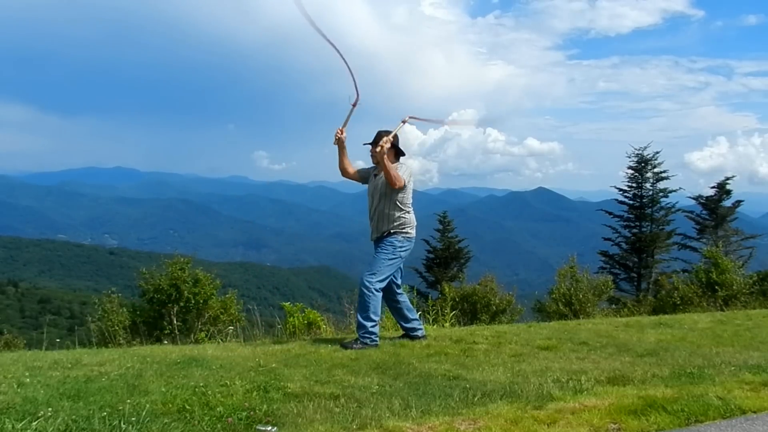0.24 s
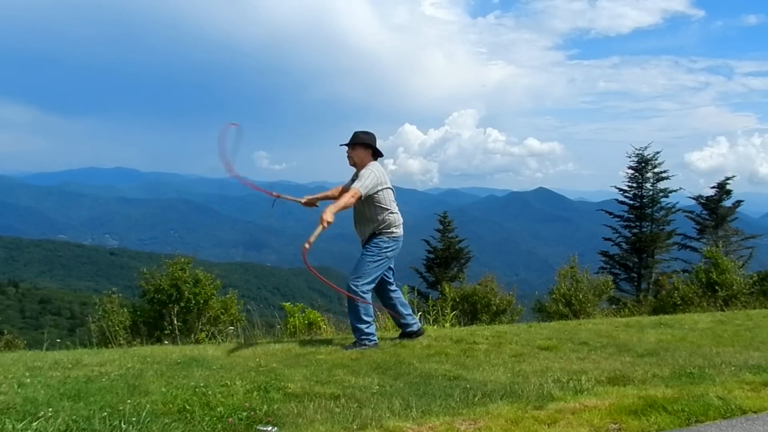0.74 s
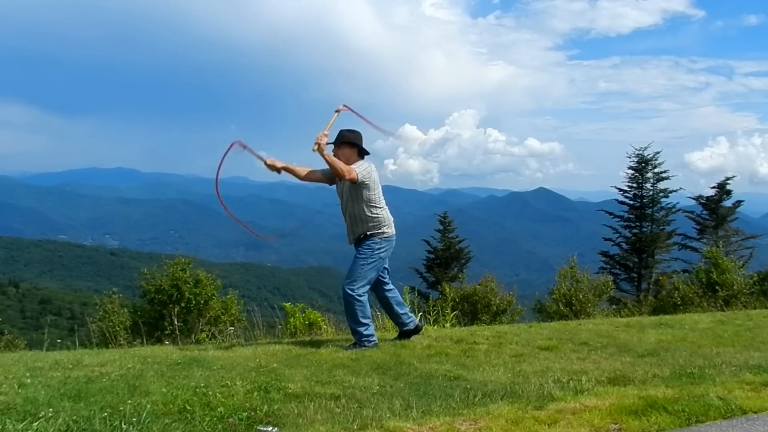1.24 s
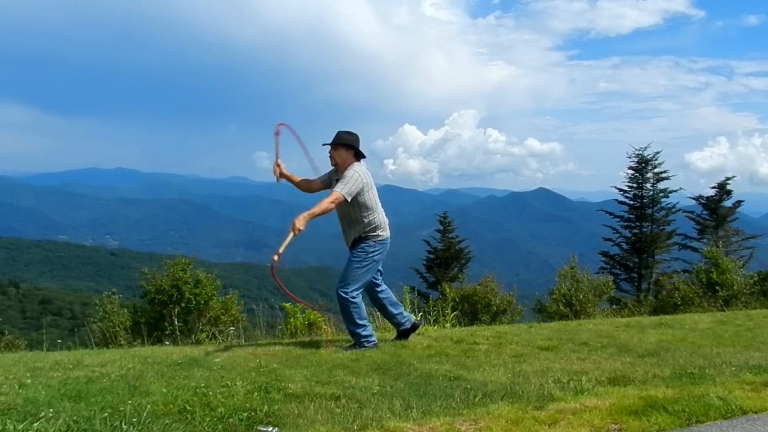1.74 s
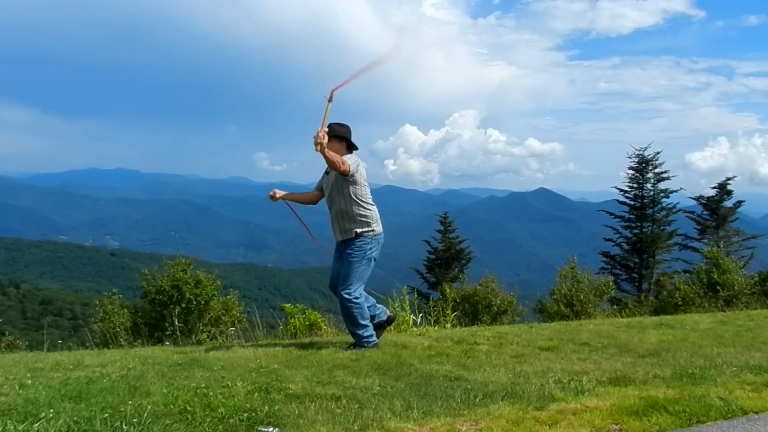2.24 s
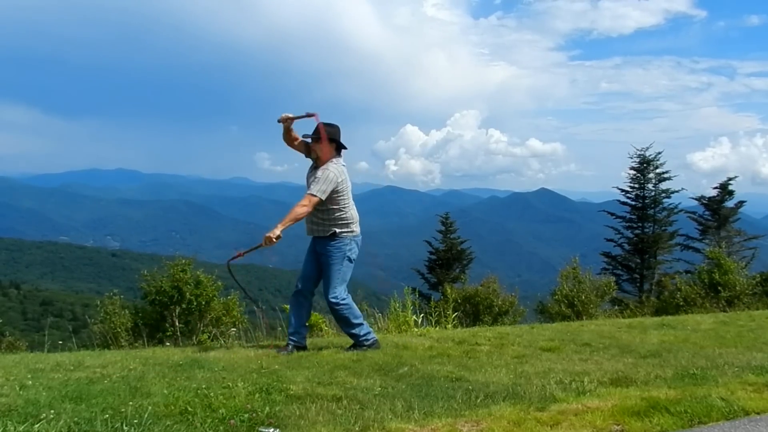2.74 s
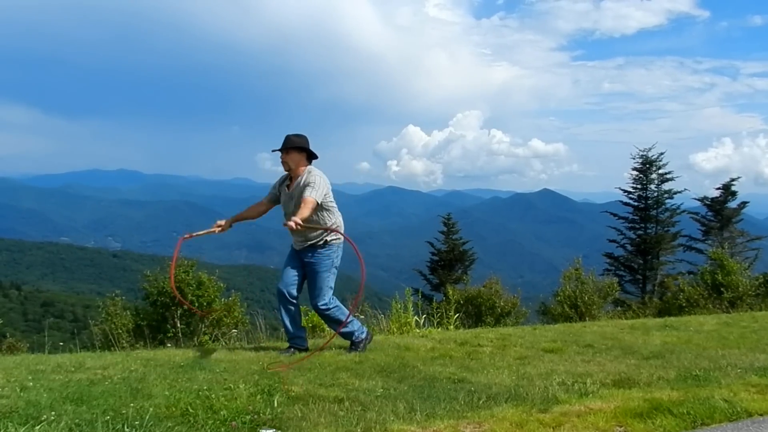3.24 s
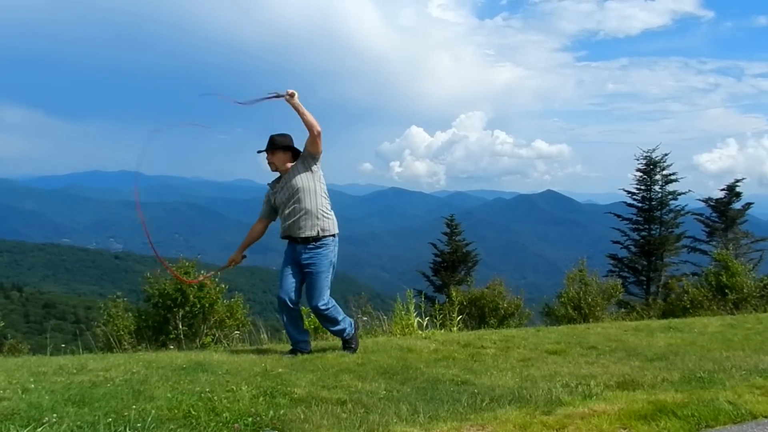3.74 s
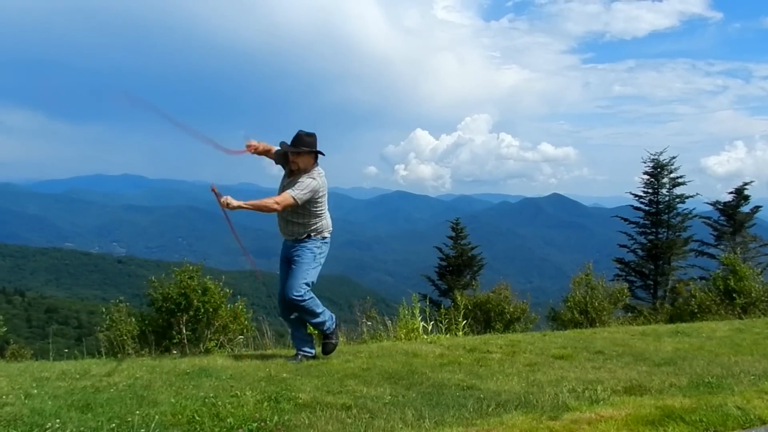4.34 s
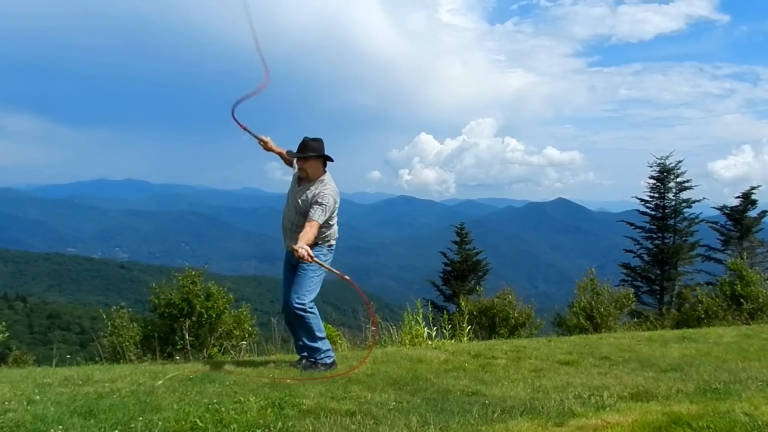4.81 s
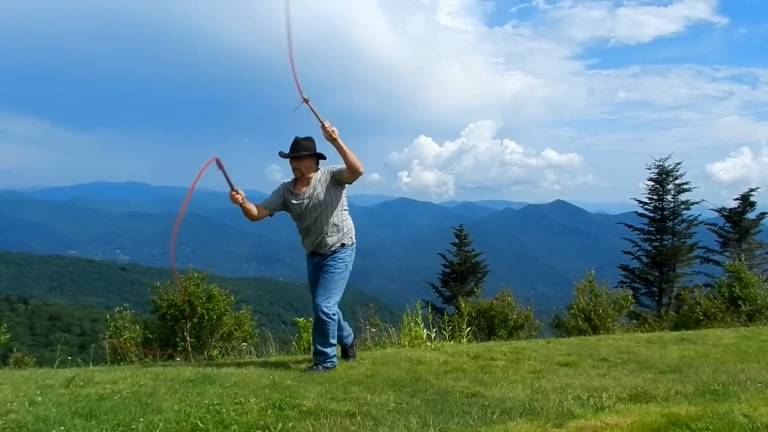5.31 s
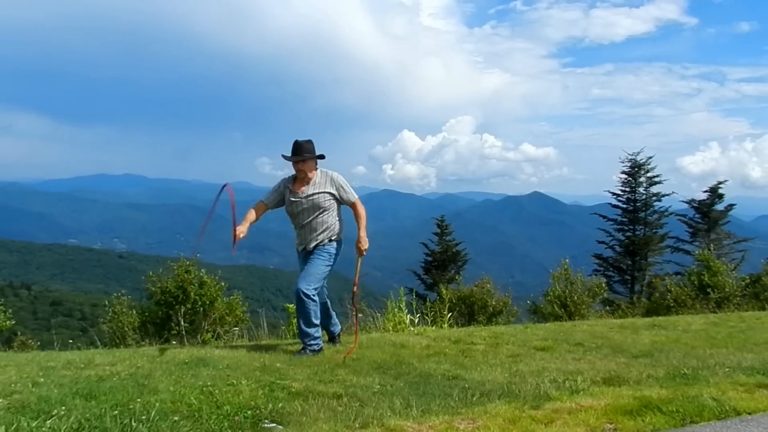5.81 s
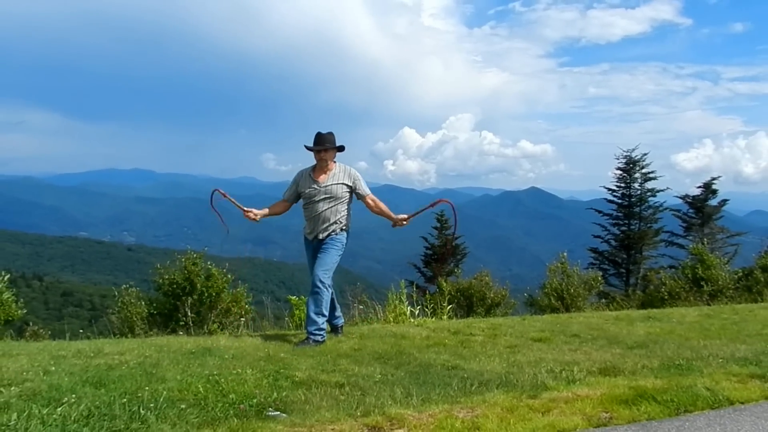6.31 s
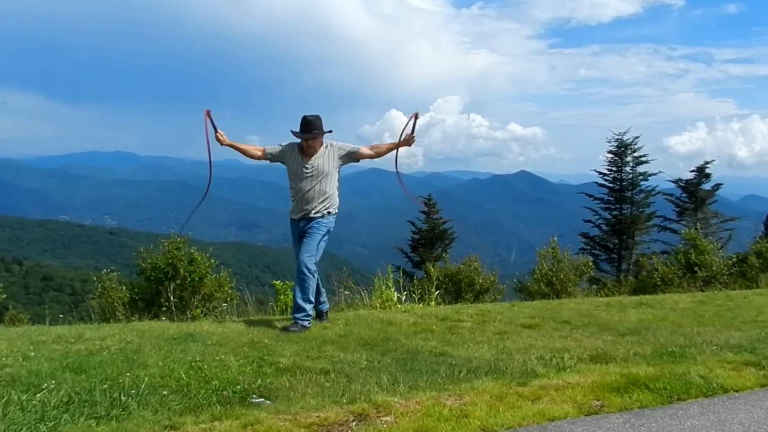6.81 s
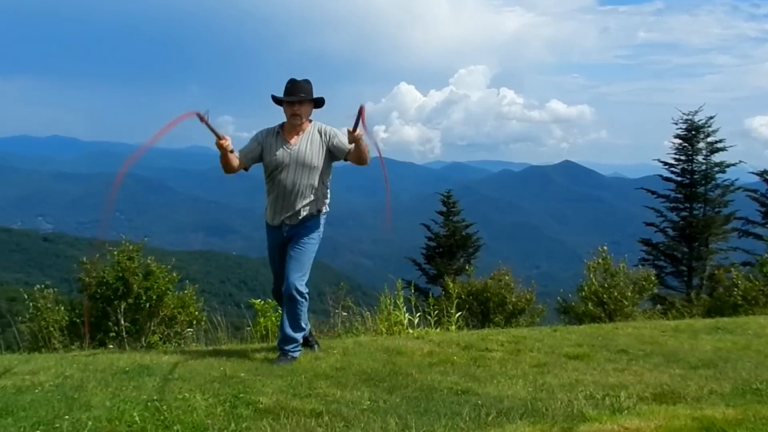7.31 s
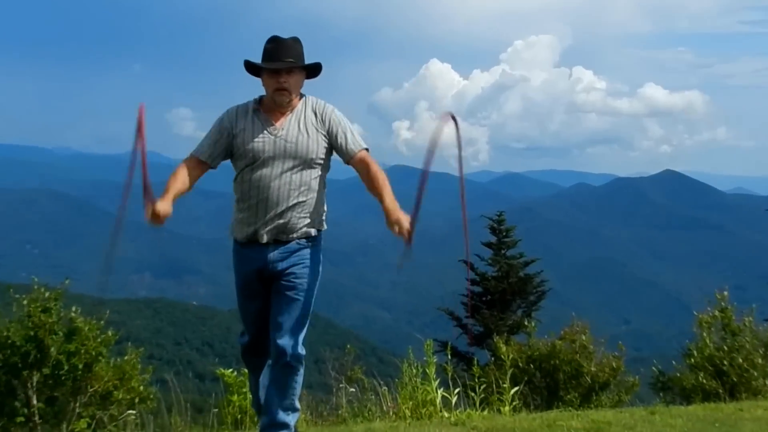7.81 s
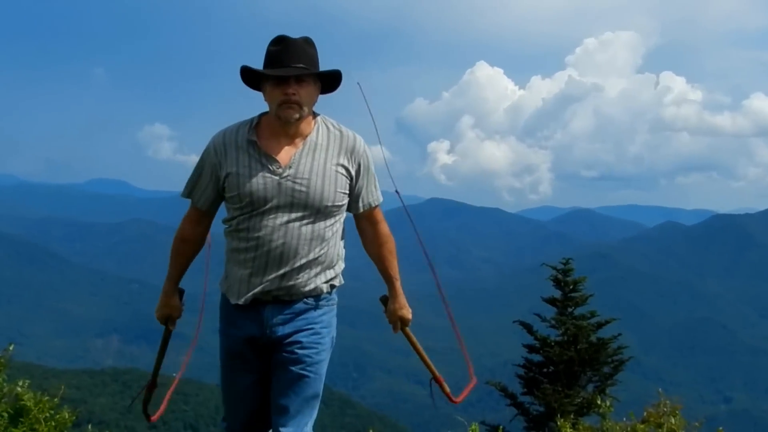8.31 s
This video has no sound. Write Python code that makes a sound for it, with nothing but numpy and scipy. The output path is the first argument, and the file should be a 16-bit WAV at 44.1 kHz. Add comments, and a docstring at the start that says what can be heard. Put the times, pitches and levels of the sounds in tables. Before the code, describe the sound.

Open grassy ridge, two whips a few metres from a stereo camera microphone. Low lumpy wind and a soft far rustle run throughout, with puffs thudding on the microphone at 0.5-0.9 s, 2.7, 4.2 and 7.1 s. Whooshes and a thin whistle lead to a weak double crack at 0.6 s, then bright hard cracks at 0.9, 1.55, 2.0 and 2.6 s, each with quick faint echoes. A duller crack comes at 3.4, a muffled, hissy one at 4.2, a weak stuttering cluster at 4.5 and another at 5.0, among swishes and light slaps. Slaps crowd 5.2-5.6 before a sharp crack at 5.7 and a huge one at 6.0. Whooshes and blunt slaps follow at 6.4-6.6, a double crack at 7.1, a duller pair at 7.45, and a violent, thumping cluster at 8.0. The background ducks after the loudest, then creeps back; a faint motor whirr, swishes and rising wind close.

```python
"""An open grassy ridge: two stock whips crack some metres from a camera, over wind and a steady far rustle.
Each crack is a shock front with noise scattered by the ground; a far bank and nearby objects echo it.
Between cracks are whooshes, whistles and swishes (band noise) and slaps (blunter shocks). Wind is lumpy low
noise with puffs on the microphone ports; a zoom motor whirrs late on. Gain control ducks after loud cracks and
creeps back. Table levels are those ahead of that gain control and band limit."""
import sys
import numpy as np
from scipy import signal
from scipy.fft import rfft, irfft, next_fast_len
from scipy.io import wavfile
from scipy.ndimage import uniform_filter1d, minimum_filter1d, map_coordinates

SR = 44100
rng = np.random.default_rng(int(sys.argv[2]) if len(sys.argv) > 2 else 0)


def generate_wav(signal):
    """Clip the signal to [-1, 1] and save it as 16-bit WAV at the path in sys.argv[1]."""
    frames = np.transpose(np.atleast_2d(signal))
    scaled = np.clip(frames, -1, 1) * 32767
    pcm = np.round(scaled).astype(np.int16)
    wavfile.write(sys.argv[1], SR, pcm)


N = 377048


def amp(db):
    """Amplitude factor of a level in dB."""
    return 10 ** (np.asarray(db) / 20)


def unit(x):
    """Scale x to unit RMS along its last axis."""
    return x / np.sqrt(np.mean(x ** 2, axis=-1, keepdims=True) + 1e-20)


def along(points, hz):
    """Read (Hz, value) points at hz on a log frequency axis."""
    point_hz, values = np.transpose(points)
    return np.interp(np.log(hz + 1), np.log(point_hz + 1), values)


def wobble(knots_per_s):
    """Smooth random curve through normally distributed knots."""
    knots = rng.standard_normal(int(N * knots_per_s / SR) + 4)
    return map_coordinates(knots, [np.arange(N) * knots_per_s / SR])


def filtered(x, response):
    """Apply a response, given as a function of Hz, by zero-padded FFT."""
    size = next_fast_len(x.shape[-1] // 2 + 1024) * 2
    spectrum = rfft(x, size) * response(np.fft.rfftfreq(size, 1 / SR))
    return irfft(spectrum, size)[..., :x.shape[-1]]


def peak(f, hz, width_hz):
    """Causal resonance with unit gain at its centre."""
    return 1j * f * width_hz / (hz * hz - f * f + 1j * f * width_hz)


def pair(n, alike):
    """Left and right white noise with correlation alike."""
    turn = np.arccos(np.clip(alike, -1, 1)) / 2
    shared, opposed = rng.standard_normal((2, n)) * [[np.cos(turn)], [np.sin(turn)]]
    return np.array([shared + opposed, shared - opposed])


# Puffs on the two ports. Each row: centre in seconds, left level in dB, right level in dB.
PORT_PUFFS = [(0.508, -19, -21), (0.725, -18.5, -9), (0.786, -10, -38), (0.872, -7, -18.5),
              (4.19, -10.5, -24), (5.323, -23, -15), (7.059, -3, -20), (7.698, -13.5, -24),
              (7.739, -15, -15), (7.767, -9.5, -30), (8.389, -17, -30.5)]


def add_puffs(out):
    """A puff on a port is a short low pulse of random phase."""
    half = 2000
    t = np.arange(-half, half) / SR
    phases = rng.uniform(0, 2 * np.pi, (len(PORT_PUFFS), 2, 1))
    for (s, left_db, right_db), phase in zip(PORT_PUFFS, phases):
        puff = np.exp(-(t / 0.0033) ** 2) * np.sin(2 * np.pi * 95 * t + phase)
        window = out[:, round(s * SR) - half:][:, :len(t)]
        window += amp([[left_db], [right_db]]) * puff


# Strength of the buffeting. Each row: time in seconds, level in dB.
WIND_STRENGTH = [(0, -39.5), (.3, -42.5), (.53, -23.5), (.67, -37), (.76, -24), (.83, -32), (.97, -23),
                 (1.25, -36), (1.8, -42), (2.3, -34), (2.55, -25), (2.7, -13), (2.82, -27.5), (3.25, -35),
                 (4.05, -32), (4.45, -36.5), (5.15, -43), (5.32, -23.5), (5.45, -35.5), (5.9, -42),
                 (6.3, -36.5), (6.45, -27.5), (6.85, -35.5), (7.08, -18), (7.35, -33.5), (7.75, -29),
                 (8.1, -29), (8.3, -20.5), (8.55, -14)]
# Buffeting spectrum. Each row: frequency in Hz, relative density in dB per Hz.
BUFFET_SPECTRUM = [(20, -27), (45, -4), (88, 2), (140, -12), (220, -18), (400, -31), (800, -65.5)]


def wind():
    """Turbulence makes lumpy low noise, slightly opposed at the two ports, plus single puffs."""
    shared_db = wobble(28)
    fast_db = 3.4 * np.array([wobble(25), wobble(25)])
    slow_db = 2.3 * np.array([wobble(8), wobble(5.9)])
    lumps = amp(shared_db + fast_db + slow_db)
    rumble = filtered(pair(N, -0.11), lambda f: amp(along(BUFFET_SPECTRUM, f)))
    s, level_db = np.transpose(WIND_STRENGTH)
    out = amp(np.interp(np.arange(N) / SR, s, level_db)) * unit(lumps * rumble)
    add_puffs(out)
    return out


# Rustle and hiss spectrum. Each row: frequency in Hz, relative density in dB per Hz.
RUSTLE_SPECTRUM = [(120, -31), (200, 0), (378, -7), (923, -27.5), (1150, -20.5), (1980, -24.5),
                   (2170, -29.5), (5300, -29.5), (8500, -38), (12700, -35), (15500, -43.5)]


def hillside():
    """A steady far rustle: shaped noise, nearly unrelated left and right."""
    rustle = filtered(pair(N, 0.17), lambda f: amp(along(RUSTLE_SPECTRUM, f)))
    return amp(-47.5 + 0.8 * wobble(2.6)) * unit(rustle)


# Airy note of the thick part of the thongs: centre in Hz, width in octaves.
THICK_THONG_NOTE = (700, .12)


def noise_band(f, hz, octaves):
    """A bell of noise power on a log frequency axis, mean 1."""
    shape = np.exp(-np.log2(f / hz) ** 2 / (2 * octaves ** 2))
    return shape / np.mean(shape, axis=0)


# Swings of a thong. Each row: peak time in seconds, level in dB, centre at the peak in Hz.
SWINGS = [(.075, -64, 1230), (.3, -48, 1040), (.525, -52.5, 760), (1.121, -45.5, 1480), (1.33, -48.5, 800),
          (1.411, -44.5, 1000), (1.761, -51, 1090), (2.179, -46, 1195), (2.459, -43, 960),
          (2.83, -44, 1013), (3.076, -49, 1613), (3.241, -47, 925), (3.6, -52.5, 1100), (3.8, -50, 1170),
          (3.96, -44, 870), (4.15, -47, 1100), (4.35, -50, 720), (4.74, -46.5, 960), (4.95, -52, 1270),
          (5.298, -41, 850), (5.477, -52.5, 1200), (5.627, -42, 1330), (5.92, -49, 1250), (6.16, -48, 1410),
          (6.63, -39.5, 1080), (6.819, -54, 1075), (6.98, -45.5, 735), (7.289, -49.5, 833),
          (7.575, -51.5, 960), (7.73, -52, 900), (7.875, -47.5, 1004), (8.175, -35, 1590),
          (8.475, -46.5, 1540)]


def add_swings(power, f, t, flutter_db):
    """Each swing swells and fades while its band sinks in pitch."""
    swell_s, sag_octaves = 0.049, 0.33  # sag per swell time
    for s, db, hz in SWINGS:
        near = np.abs(t - s) < 0.25
        age = (t[near] - s) / swell_s
        whoosh = noise_band(f, hz * 2 ** (-sag_octaves * age), 0.47) * amp(flutter_db[:, near])
        air = whoosh + 0.13 * noise_band(f, *THICK_THONG_NOTE)
        power[:, near] += amp(2 * db) * np.exp(-age ** 2) * air


# Whistles, swishes and a muffled crack near 4.19 s. Each row: peak time in seconds, amplitude fall time
# constant in seconds, level in dB, first centre in Hz, centre approached in Hz, width in octaves (played
# no narrower than 0.03).
WHISTLES_AND_SWISHES = [(.176, .015, -36, 4400, 4140, 0.22), (.05, 0.025, -52, 1550, 1450, .08),
                        (.184, 0.053, -31.5, 1280, 995, 0.21), (.19, 0.051, -38, 2390, 800, 0.41),
                        (0.261, 0.022, -38, 4730, 3000, 0.41), (.28, 0.14, -47, 762, 651, 0.067),
                        (0.592, 0.086, -40, 2970, 3960, 1), (1.146, 0.046, -36, 2260, 700, 0.25),
                        (1.219, 0.076, -46.5, 732, 684, 0.023), (1.749, 0.034, -39, 4860, 4450, 0.31),
                        (1.8, 0.058, -56, 696, 660, 0.036), (1.85, 0.04, -47.5, 5380, 5460, 0.17),
                        (2.158, 0.019, -38.5, 4500, 4140, .15), (2.436, 0.011, -34, 1600, 1100, 0.23),
                        (2.45, .017, -44.5, 2490, 2000, 0.14), (2.799, 0.036, -37.5, 1526, 706, 0.073),
                        (3.545, 0.032, -31.5, 750, 907, 0.088), (3.572, 0.024, -36.5, 1400, 810, .2),
                        (3.566, .011, -36.5, 3420, 2500, .17), (3.743, 0.037, -41.5, 1640, 1700, 0.13),
                        (3.77, 0.012, -41.5, 3500, 3850, 0.11), (3.923, 0.013, -38, 3220, 2900, 0.18),
                        (3.929, 0.025, -35.5, 1430, 860, 0.058), (4.07, 0.025, -39.5, 1470, 1100, 0.62),
                        (4.02, .04, -44.5, 610, 700, 0.055), (4.187, 0.025, -18.5, 1020, 1250, 1.4),
                        (4.195, 0.0078, -15, 5530, 6900, 0.32), (4.201, 0.011, -13.5, 3250, 3200, 0.17),
                        (4.25, 0.027, -34.5, 3900, 5060, 0.91), (4.6, 0.055, -41.5, 1240, 1310, 0.17),
                        (4.604, 0.052, -43, 3660, 1200, 0.23), (4.64, 0.037, -42, 1390, 800, 0.97),
                        (4.769, 0.018, -42.5, 1030, 950, 0.03), (4.872, 0.01, -47, 2660, 2500, 0.13),
                        (4.881, .07, -40.5, 1010, 810, 0.16), (5.124, 0.028, -31.5, 1840, 710, 0.13),
                        (5.122, 0.015, -37, 3380, 4000, 0.52), (5.27, 0.038, -40, 2200, 2100, .05),
                        (5.299, 0.016, -31.5, 5870, 6000, .071), (5.485, 0.013, -33, 4470, 4500, 0.17),
                        (5.508, 0.055, -39.5, 840, 770, 0.1), (5.626, 0.0089, -31, 1550, 1360, 0.035),
                        (5.72, .03, -45, 3000, 3970, 1.5), (6.452, 0.011, -27, 1590, 898, 0.47),
                        (6.71, .02, -39, 2200, 1900, 0.32), (6.626, 0.028, -22.5, 1634, 798, 0.27),
                        (6.931, 0.014, -38.5, 2010, 1850, 0.15), (7.232, 0.021, -47.5, 3980, 4500, 0.45),
                        (7.812, 0.033, -46, 2380, 1900, .08), (7.93, 0.058, -45, 790, 750, 0.21)]


def add_whistles_and_swishes(power, f, t, flutter_db):
    """Whistles, swishes and a muffled crack: narrow to wide noise bands, steady or gliding, that fade."""
    rise_s = 0.0075
    for s, fall_s, db, first_hz, last_hz, octaves in WHISTLES_AND_SWISHES:
        near = np.abs(t - s) < 0.25
        age_s = t[near] - s
        swell = np.exp(-2 * np.where(age_s < 0, (age_s / rise_s) ** 2, np.abs(age_s) / fall_s))
        glide_hz = last_hz + (first_hz - last_hz) * np.exp(-np.maximum(age_s, 0) / fall_s)
        band = noise_band(f, glide_hz, max(octaves, 0.03)) * amp(0.64 * flutter_db[:, near])
        power[:, near] += amp(2 * db) * swell * band


def thongs():
    """Moving thongs shed eddies: noise whose spectrum follows stirring, swings, whistles and swishes."""
    frames = dict(nperseg=512, noverlap=448)
    f, t, noise = signal.stft(pair(N, 0.9), SR, **frames)
    f = np.maximum(f, 1)[:, None]
    grain = uniform_filter1d(rng.standard_normal(noise.shape[1:]), size=4, axis=0)
    flutter_db = 7 * unit(uniform_filter1d(grain, size=14))
    stir_db = -58.5  # the thongs never rest
    stir = noise_band(f, 950, 0.42) * amp(flutter_db) + 0.14 * noise_band(f, *THICK_THONG_NOTE)
    power = amp(2 * stir_db) * stir
    add_swings(power, f, t, flutter_db)
    add_whistles_and_swishes(power, f, t, flutter_db)
    return signal.istft(noise * np.sqrt(power), SR, **frames)[1][:, :N]


def shock_front(t, hz, scatter_db, front_s, edge_hz):
    """Suction, then a jump to pressure; close bounces repeat it at the ring pitch."""
    u = t / front_s
    suction = -np.exp(np.minimum(u, 0) * 0.6)
    pressure = 0.9 * (1 - 0.4 * u) * np.exp(-0.6 * np.abs(u))
    shock = np.where(t < 0, suction, pressure)
    shock = filtered(shock, lambda f: 1 / (1 + 1j * f / edge_hz) ** 2)  # soft or far fronts lose their edge
    bounces = filtered(shock, lambda f: peak(f, hz, 0.3 * hz))
    return shock + amp(scatter_db + 25) * bounces


def scatter_fade(t, t60_s, far_db):
    """Near ground answers first and dies fast; bushes further off add a weaker, slower tail."""
    swell = (t > 0) * (1 - np.exp(-np.abs(t) / 0.00083))
    fade = swell * (amp(-60 * np.abs(t) / t60_s) + amp(far_db - 60 * np.abs(t) / 0.11))
    reflections_db = 2.5 * unit(uniform_filter1d(rng.standard_normal(len(t)), size=40))
    return fade * amp(reflections_db)


# Fizz spectrum of the scatter. Each row: frequency in Hz, relative density in dB per Hz.
FIZZ_SPECTRUM = [(2000, -10.5), (3500, -1.5), (8000, 0), (12500, -11.5), (16000, -27.5)]


def snap(out, s, db, hz, scatter_db, fizz_db, thump_db, t60_s, pan_db, far_db, front_s, edge_hz):
    """Return out plus one shock: a faint noise lead-in, front, low push and ground scatter."""
    lead = SR // 36
    t = (np.arange(SR // 6) - lead) / SR
    shock = shock_front(t, hz, scatter_db, front_s, edge_hz)
    push = amp(thump_db + 12.5) * -np.sin(2 * np.pi * 120 * t) * amp(-60 * np.abs(t) / 0.02) * (t > 0)
    fade = scatter_fade(t, t60_s, far_db)
    body = unit(filtered(pair(len(t), 0.95), lambda f: peak(f, hz, 0.25 * hz) - 0.45 * peak(f, 1700, 2200)))
    fizz = unit(filtered(pair(len(t), 0.29), lambda f: amp(along(FIZZ_SPECTRUM, f))))
    scatter = fade * (amp(scatter_db + 6.5) * body + amp(fizz_db + 8) * fizz)
    # a faint noise lead-in swells before each shock, its level capped for hard ones
    lead_in = np.exp(-np.abs(t) / 0.0087) * (t < 0) * (body + 0.6 * fizz)
    sound = shock + push + scatter + amp(min(-24, -17 - db)) * lead_in
    gain = amp(db + np.array([[pan_db], [-pan_db]]) / 2)
    start = round(s * SR) - lead
    return out + np.pad(gain * sound, ((0, 0), (start, N)))[:, :N]


# Slaps on grass and cloth, and half cracks. Each row: time in seconds, shock level in dB, ring in Hz,
# then scatter and fizz settings in dB re the shock, before the fixed offsets in snap().
SLAPS = [(0.2588, -33, 810, -12.5, -35), (1.1263, -27.5, 5700, -4.5, -24), (1.5263, -17, 1500, -22, -9),
         (1.6573, -24, 5730, -19, -16), (1.9689, -37.5, 645, -8.5, -17),
         (2.7835, -18.5, 2120, -24.5, -16.5), (2.9039, -33.5, 770, -4, -36.5),
         (3.8038, -42.5, 4250, -7.5, -32), (3.9877, -30, 885, -40, -18.5),
         (4.0582, -38.5, 1190, -9.5, -25.5), (4.8058, -34.5, 650, -14, -8), (4.8719, -41, 800, -12, -27.5),
         (4.9729, -38, 1210, -16.5, -26), (5.2245, -26, 330.4, -14.5, -20),
         (5.2643, -29.5, 500, -12, -18.5), (5.2988, -26, 6100, -13.5, -11.5),
         (5.3494, -25.5, 1010, -19, -21), (5.468, -35.5, 900, -14, -35), (5.4813, -30.5, 1220, -11, -26.5),
         (5.5413, -25.5, 4524, -13, -20), (5.556, -29, 756, -15.5, -22.5), (6.4323, -23.5, 398, -23.5, -43),
         (6.4506, -28, 667, -9.5, -59), (6.6357, -17, 1723, -16, -33.5), (6.8119, -35.5, 846, -16, -19),
         (6.948, -40.5, 690, -9.5, -57), (7.2502, -24, 560, -11.5, -58)]


def slaps():
    """Softer, blunter shocks: the front lengthens as the ring pitch drops."""
    out = np.zeros((2, N))
    for row in SLAPS:
        hz = row[2]
        out = snap(out, *row, thump_db=-11.5, t60_s=0.04, pan_db=2, far_db=-8.5,
                   front_s=0.64 / hz, edge_hz=3 * hz)
    return out


# Cracks. Each row: time in seconds, shock level in dB, ring in Hz, then scatter, fizz and thump settings in dB
# re the shock, before the fixed offsets in snap(), near scatter T60 in seconds, left minus right in dB.
CRACKS = [(0.5954, -17.5, 378, -12, -14, -5.5, 0.1, 2), (0.6051, -8, 1218, -20.5, -24.5, -20.5, 0.064, 0),
          (0.9195, 15.5, 1496, -19, -13.5, -35, 0.033, 0),
          (1.5536, 14, 1335, -25.5, -17.5, -32, 0.065, 2.5),
          (2.0216, 15, 1647, -23.5, -34.5, -26, 0.063, 3), (2.5805, 23, 1511, -32, -17.5, -39.5, 0.062, 1),
          (3.3757, -1, 604.6, -17.5, -30.5, -23.5, 0.05, 2.3),
          (4.472, -11, 482, -21.5, -24.5, -11, 0.031, 0.5),
          (4.4828, -16.5, 629.6, -17.5, -15.5, -5, 0.082, -1.5),
          (4.4908, -19.5, 690, -22.5, -19.5, -21, 0.025, 11.5),
          (5.0403, -7.5, 634.7, -12.5, -34.5, -16.5, 0.022, 2.5),
          (5.7294, 12.5, 1068, -15, -11, -27.5, 0.036, 0.8),
          (6.0026, 33, 1403, -20.5, -20.5, -41, 0.05, -0.6),
          (7.1017, 7, 560, -14.5, -23.5, -46.5, 0.05, -1.5),
          (7.111, 10, 1368, -18.5, -11.5, -34.5, 0.065, 0),
          (7.4421, -4.5, 608.7, -18, -37.5, -7, 0.05, 2.25), (7.456, -11, 405, -21, -34.5, -4, 0.065, 2),
          (7.9888, 24.5, 390, -21, -32.5, -15, 0.12, 0), (7.9896, 31, 900, -27.5, -32.5, -10.5, 0.03, 1.5),
          (7.9955, 17, 1545, -25.5, -20, -35, 0.022, -8), (8.0117, 37.5, 1448, -19, -22.5, -10, 0.055, 2.5)]


def cracks():
    """Each crack is a sharp, short shock front."""
    out = np.zeros((2, N))
    for row in CRACKS:
        out = snap(out, *row, far_db=-12, front_s=0.00016, edge_hz=30000)
    return out


def add_echo(out, s, db, hz, scatter_db, fizz_db):
    """A returned shock: almost no thump, short front, edge dulled by distance."""
    return snap(out, s, db, hz, scatter_db, fizz_db, thump_db=-45, t60_s=0.024, pan_db=5,
                far_db=-17.5, front_s=0.00007, edge_hz=15000)


def bank_echoes():
    """A far bank answers every crack; its level grows slower than the crack's."""
    delay_s, offset_db, growth_db_per_db = 0.103, -40, 0.7
    out = np.zeros((2, N))
    for s, crack_db, *_ in CRACKS:
        db = growth_db_per_db * crack_db + offset_db
        out = add_echo(out, s + delay_s, db, hz=1874, scatter_db=-12.5, fizz_db=-40)
    return out


# Returns of cracks aimed at a nearby object, each followed by a return from a further reflector. Each row:
# first return in seconds, its level in dB, ring in Hz, scatter setting in dB re the shock, before the fixed
# offsets in snap(), level of the further return in dB.
OBJECT_ECHOES = [(0.959, -5.5, 1533, -10, -27), (1.5963, 3, 6100, -21, -13), (2.06, -2, 2780, -11, -23.5),
                 (2.6243, -5.5, 1497, -10.5, -33.5), (5.7734, -10.5, 1370, -6, -31)]


def object_echoes():
    """A nearby object sends the shock back; a second, further reflector returns it again a fixed gap later."""
    second_gap_s, fizz_db = 0.0843, -25
    out = np.zeros((2, N))
    for s, db, hz, scatter_db, second_db in OBJECT_ECHOES:
        out = add_echo(out, s, db, hz, scatter_db, fizz_db)
        out = add_echo(out, s + second_gap_s, second_db, hz, scatter_db, fizz_db)
    return out


# Zoom motor resonances. Each row: centre in Hz, width in Hz, relative level in dB.
MOTOR_RESONANCES = [(2070, 170, 14.5), (4400, 1000, 3.5), (8300, 370, -12.5), (11000, 2600, -16.5)]


def lens():
    """The zoom motor whirrs faintly: resonant noise ramping in from 7.2 s."""
    def response(f):
        return sum(amp(db) * np.abs(peak(f, hz, width_hz)) ** 2 for hz, width_hz, db in MOTOR_RESONANCES)

    whirr = filtered(pair(N, 0.26), response)
    ramp = np.clip((np.arange(N) / SR - 7.2) / 0.81, 0, 1)
    return amp(-55.5) * ramp * unit(whirr)


def causal(points):
    """Minimum-phase response with the gain of (Hz, dB) points: nothing rings before a blow."""
    def response(f):
        cepstrum = irfft(np.log(amp(along(points, f))))
        half = len(cepstrum) // 2
        cepstrum[1:half] *= 2
        cepstrum[half + 1:] = 0
        return np.exp(rfft(cepstrum))[:len(f)]
    return response


# Colour of grass and camera body. Each row: frequency in Hz, gain in dB.
GROUND_COLOUR = [(120, -4), (290, 10), (480, 0.5), (660, 6), (950, -0.5), (1900, -2.5), (2400, -5.5),
                 (3200, -5), (9000, -9), (13000, -2.5)]


def scene():
    """Ground-coloured whips over wind, rustle and motor."""
    air = wind() + hillside()
    whips = thongs() + slaps() + cracks() + bank_echoes() + object_echoes()
    return air + filtered(whips, causal(GROUND_COLOUR)) + lens()


def record(dry):
    """Gain control drops at once above a ceiling and recovers steadily; soft clip; band limit."""
    ceiling_db, release_db_per_s, clip_level, top_hz = -3.5, 15.5, 0.8, 15900
    ramp_db = release_db_per_s * np.arange(N) / SR
    level_db = 20 * np.log10(np.abs(dry.mean(axis=0)) + 1e-9)
    over_db = np.maximum(level_db - ceiling_db, 0)
    over_db = -minimum_filter1d(-over_db, size=61)  # running maximum
    held_db = np.maximum.accumulate(over_db + ramp_db) - ramp_db
    duck_db = uniform_filter1d(held_db, size=31)
    x = dry * amp(-duck_db)
    x = x / (1 + np.abs(x / clip_level) ** 6) ** (1 / 6)
    return filtered(x, lambda f: (f < top_hz) * (1j * f / (1j * f + 50)) ** 3)


dry = scene()
out = record(dry)
generate_wav(out)
```